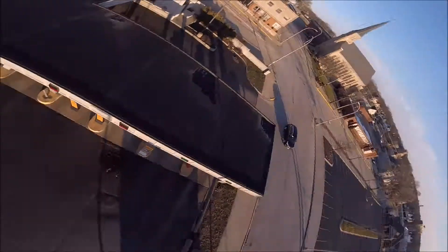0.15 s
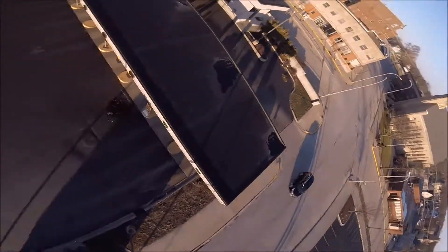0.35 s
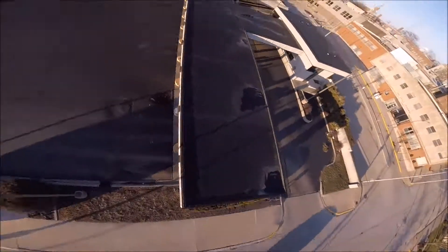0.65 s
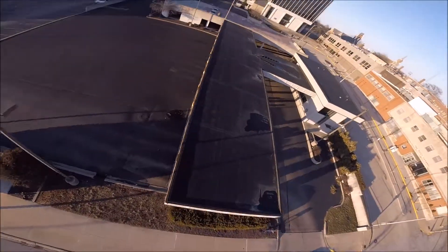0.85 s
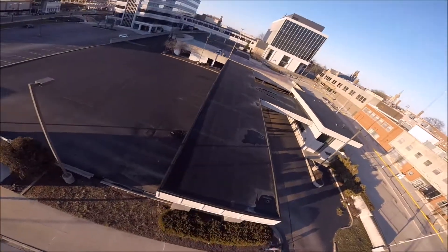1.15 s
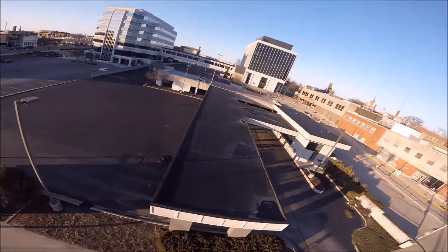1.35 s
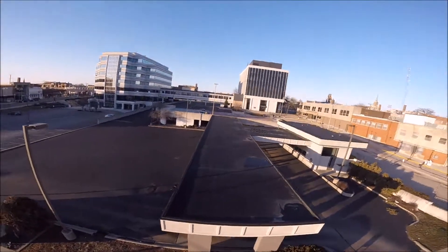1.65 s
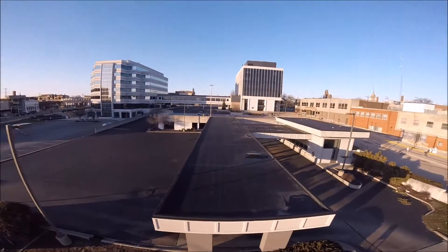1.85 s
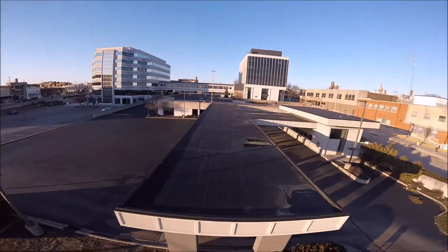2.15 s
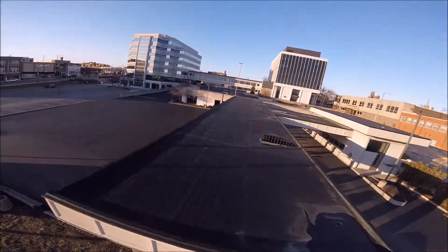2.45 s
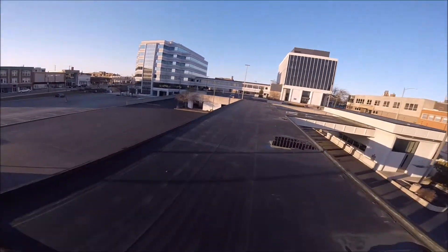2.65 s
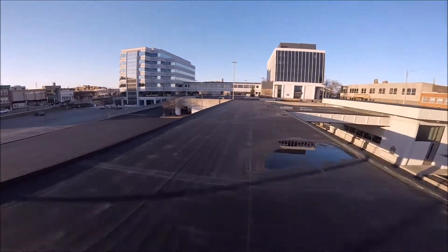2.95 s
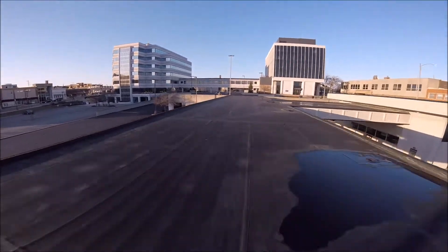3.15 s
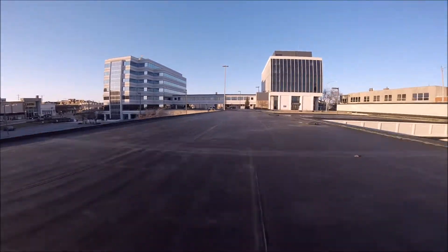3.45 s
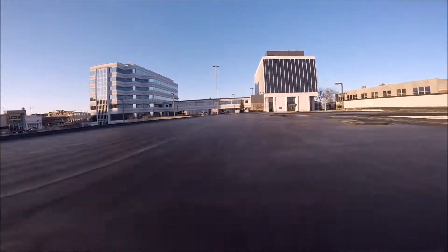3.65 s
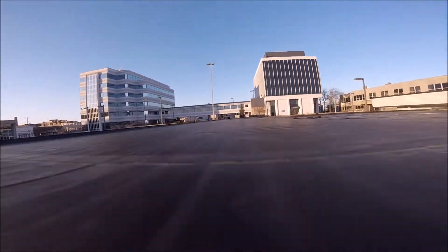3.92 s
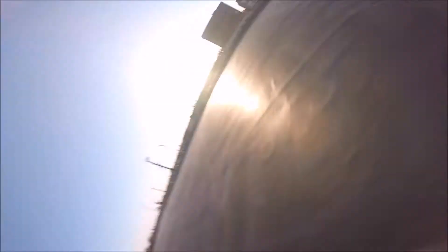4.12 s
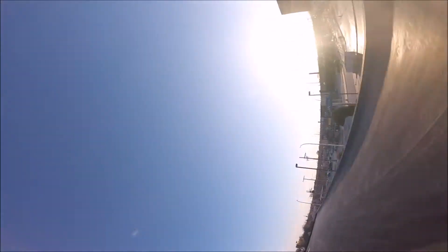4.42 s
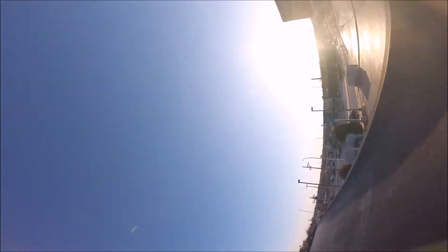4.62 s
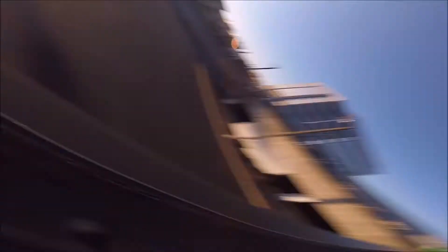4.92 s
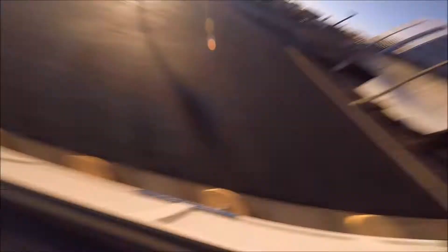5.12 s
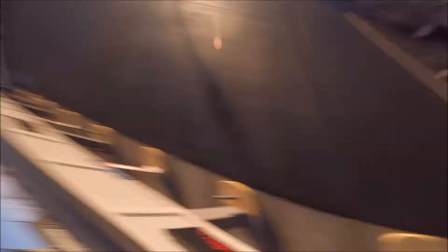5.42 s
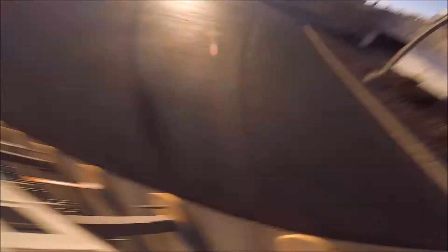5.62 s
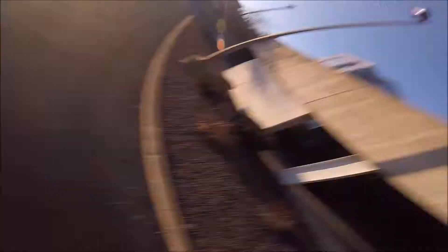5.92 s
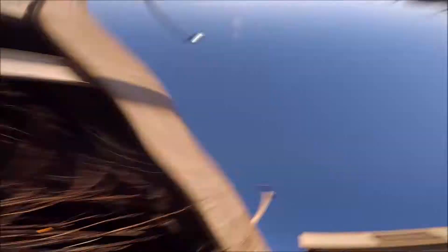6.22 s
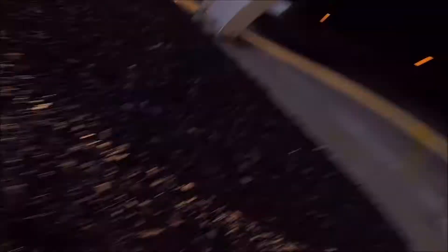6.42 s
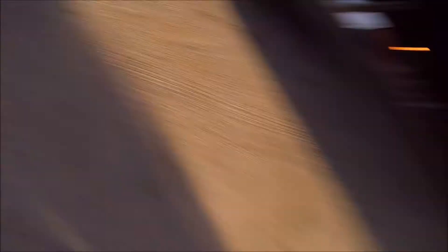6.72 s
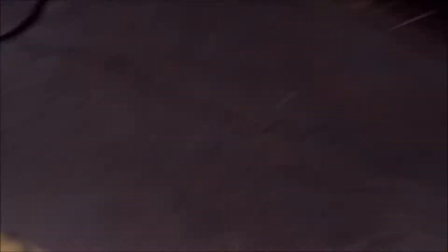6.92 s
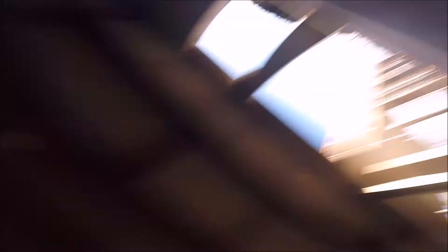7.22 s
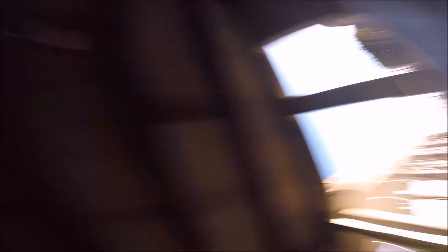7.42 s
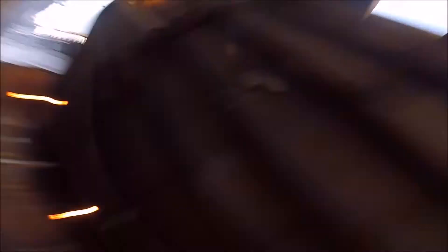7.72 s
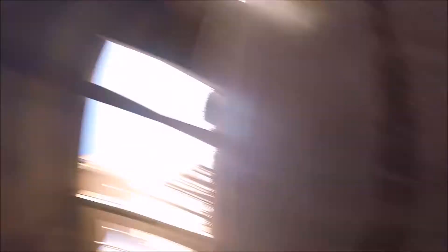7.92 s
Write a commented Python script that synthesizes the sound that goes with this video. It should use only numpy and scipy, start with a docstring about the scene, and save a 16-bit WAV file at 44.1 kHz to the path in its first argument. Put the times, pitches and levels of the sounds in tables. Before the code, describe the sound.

A close microphone on a small drone catches wind rumble and a sinking howl, then four buzzing rotors surging and beating together. After a sharp knock comes a brief piercing scream that drops away. A cluster of hits ends the motor sound. Chopped whooshes grow stronger in free fall, then dull thuds, plastic clacks and gritty cracks tumble over a concrete deck.

```python
"""Over a flat roof and down into a concrete parking deck, a small racing drone is heard from its own camera.
It dives and skims the roof: four three-bladed rotors, harmonic series of their shaft speeds, whine and beat in the wind.
It clips the roof, races upside down, winds down and strikes the edge; in free fall each turn chops the air as a puff of noise.
It cartwheels over concrete: decaying resonances knock in the frame, and bursts of coloured noise are the clacking propellers."""
import sys
import numpy as np
from scipy import signal
from scipy.fft import rfft, irfft
from scipy.io import wavfile
from scipy.ndimage import uniform_filter1d, minimum_filter1d

SR = 44100
rng = np.random.default_rng(int(sys.argv[2]) if len(sys.argv) > 2 else 0)


def store_wav(level_fs):
    """Save 16-bit WAV to argv[1]."""
    pcm = np.round(np.clip(np.atleast_2d(level_fs), -1, 1) * 32767)
    wavfile.write(sys.argv[1], SR, pcm.T.astype(np.int16))


N = 355446
TIME = np.arange(N) / SR
FLIP_S, EDGE_S, LANDING_S = 4.09, 4.83, 6.275   # turns upside down, strikes the edge, reaches the ground


def from_db(db):
    """Level to amplitude: 20 dB is a factor of ten."""
    return 10 ** (np.asarray(db) / 20)


def rms_one(x):
    """Normalisation to unit mean power."""
    return x / np.sqrt(np.mean(x ** 2) + 1e-20)


def in_time(rows):
    """Linear interpolation of each column of a curve at every sample."""
    s, *columns = np.transpose(rows)
    return [np.interp(TIME, s, c) for c in columns]


def until(end, fade):
    """Envelope of one until the end time, then a straight fade."""
    return np.clip(1 - (TIME - end) / fade, 0, 1)


def during(start, end, fade):
    """Envelope of one between two times, with straight fades centred on them."""
    return np.clip(np.minimum(TIME - start, end - TIME) / fade + .5, 0, 1)


def at_hz(points, hz):
    """Spectral gain, interpolated in dB over logarithmic frequency."""
    f, db = np.transpose(points)
    return from_db(np.interp(np.log(np.maximum(hz, 1)), np.log(f), db))


def with_skirts(spectrum, hz):
    """Spectral gain that falls 12 dB per octave further beyond the ends of the spectrum."""
    low_skirt = np.minimum(1, hz / spectrum[0][0]) ** 2
    high_skirt = np.minimum(1, spectrum[-1][0] / hz) ** 2
    return at_hz(spectrum, hz) * low_skirt * high_skirt


def noise(spectrum):
    """Coloured noise of unit power, shaped in the frequency domain."""
    hz = np.arange(N // 2 + 1) * SR / N + 1e-3
    return rms_one(irfft(rfft(rng.standard_normal(N)) * with_skirts(spectrum, hz), N))


def coloured(x, spectrum):
    """Minimum-phase filtering, causal; the response has unit energy, so white noise keeps its power."""
    hz = np.linspace(1e-3, SR / 2, 4097)
    cepstrum = irfft(np.log(with_skirts(spectrum, hz) + 1e-6))
    # folding the cepstrum onto positive times makes the filter causal
    folded = 2 * cepstrum * (np.arange(len(cepstrum)) < len(hz))
    response = irfft(np.exp(rfft(folded)))
    return signal.oaconvolve(x, response / np.sqrt(np.sum(response ** 2)))[:N]


def drift(rate):
    """Low-passed random process of unit power, changing about this often a second."""
    r = np.exp(-40 * np.pi * rate / SR)   # one step every 20 samples
    slow = signal.lfilter([1], [1, -2 * r, r * r], rng.standard_normal(N // 20 + 4002))[4000:]
    return np.interp(np.arange(N) / 20, np.arange(len(slow)), rms_one(slow))


def flicker(depth_db, rate):
    """Random amplitude modulation, held within two depths."""
    return from_db(depth_db * np.clip(drift(rate), -2, 2))


def lumpy(spectrum, depth_db, rate):
    """Turbulent noise: coloured noise whose level flickers."""
    return rms_one(noise(spectrum) * flicker(depth_db, rate))


def gritty(depth_db, rate):
    """White noise that comes in clumps by amplitude modulation."""
    return rms_one(rng.standard_normal(N) * flicker(depth_db, rate))


def ring(clicks, hz, t60):
    """Damped resonance: a unit click sets a sine of height about 1 ringing."""
    r, w = from_db(-60 / (t60 * SR)), 2 * np.pi * hz / SR
    return signal.lfilter([0, np.sin(w)], [1, -2 * r * np.cos(w), r * r], clicks + 1e-18)


def dying(clicks, t60):
    """Exponential decay started by each click."""
    return signal.lfilter([1], [1, -from_db(-60 / (t60 * SR))], clicks + 1e-18)


# Throttle: common shaft speed of the rotors [start_s, shaft_hz]
SHAFT_SPEED = [(0, 99.8), (.31, 93.07), (.47, 64.9), (.62, 59.04), (.69, 52.1), (.72, 41.85), (.78, 69.2),
               (.84, 132), (.9, 189.9), (1.0, 257.1), (1.16, 276.4), (1.24, 242.5), (1.31, 230.4),
               (1.4, 202.6), (1.57, 252.8), (1.68, 241.9), (1.82, 261.2), (1.91, 265.3), (1.99, 243.7),
               (2.09, 195.9), (2.2, 179.7), (2.28, 153.3), (2.39, 148.4), (2.44, 165.2), (2.56, 240.4),
               (2.66, 261), (2.74, 252), (2.85, 214.4), (3.0, 210.2), (3.08, 186.4), (3.2, 184.6),
               (3.34, 225.1), (3.61, 228.6), (3.81, 251), (3.86, 220.2), (3.91, 127.9), (3.99, 89.96),
               (4.07, 150.1), (4.125, 225), (4.148, 360.7), (4.183, 413.4), (4.2, 412.7), (4.22, 423.2),
               (4.236, 413.4), (4.253, 421), (4.31, 287.1), (4.35, 245.5), (4.4, 229), (4.47, 181.8),
               (4.54, 177.4), (4.6, 135.7), (4.73, 112.7)]
# Steering pulls the four speeds apart [start_s, spread as a share of the speed]
STEERING_SPREAD = [(0, 0.28), (.45, .22), (.62, 0.094), (.76, 0.099), (.88, 0.26), (1.03, 0.14),
                   (1.15, 0.13), (1.45, 0.094), (1.6, 0.075), (2.0, 0.068), (2.1, 0.031), (2.5, 0.036),
                   (2.62, 0.073), (2.85, 0.051), (3.02, 0.055), (3.15, 0.041), (3.35, 0.081), (3.8, 0.07),
                   (4.02, 0.2), (4.18, 0.029), (4.26, 0.038), (4.34, 0.052), (4.8, .06)]
# Each motor; levels relative [offset in spreads, hum_db, blade_tone_db, overtones_db, lateness in lags]
ROTOR_MOTORS = [(.05, -5, -2, -1.5, 0), (-.65, -5, -9, -10, .8), (.4, -6.5, -9.5, -10, -.6),
                (-1.6, -9, -7, -5, 1)]
# In abrupt manoeuvres the motors answer one after another [start_s, end_s, lag_s]
MOTOR_STAGGERS = [(.79, .98, .07), (4.265, 4.34, .022)]
# Unbalanced rotors shake the camera most near cruising speed [shaft_hz, relative level_db]
HUM_RESPONSE = [(60, -37.5), (120, -29.5), (145, -34.5), (188, -31), (220, -29), (243, -18.5), (266, -19),
                (300, -33), (420, -41)]
# Blade overtones [frequency_hz, relative level_db]
RASP_SPECTRUM = [(500, 7), (900, 6.5), (1500, 1), (2400, -1), (3200, -5), (4200, -18), (5200, -8.5),
                 (7000, -36), (10000, -41.5)]
# Overtones at full throttle [multiple of the shaft speed, level_db relative to the blade tone]
SCREAM_PARTIALS = [(2, -16), (4, -25.5), (6, -12.5), (8, -26), (9, -15), (11, -25), (12, -12.5), (13, -24),
                   (15, -15), (18, -22.5)]
# Churned air smears overtones into roar, clean air lets them sing
# [start_s, end_s, level_db moved from overtones to wash]
AIR_CHURN = [(1.1, 1.45, 1.5), (1.9, 3.0, -1.5), (3.2, 3.9, 1.5), (4.33, 4.9, 2.5)]
# Churned air [frequency_hz, relative level_db]
WASH_SPECTRUM = [(300, -21), (700, 11.5), (1100, -4.5), (1800, -6.5), (2500, -5), (3400, -6.5),
                 (4300, -16.5), (6000, -23.5)]
# Blade tip hiss, also the sizzle of the dive [frequency_hz, relative level_db]
HISS_SPECTRUM = [(2500, -33.5), (4200, -6), (5000, 4), (6500, 5), (7800, -1), (9000, -9), (10800, -18),
                 (12000, -35.5), (14000, -29.5), (16000, -55.5)]
FULL_FROM_HZ, FULL_SPAN_HZ = 281, 76   # shaft speed where full throttle sets in
CLEAN_DB = -18   # the ragged rasp and air noise change by this at full throttle
# pulling out of the dive, the rotors chop their own wake: pitch shudders, a harsh band of the rasp stands out
WAKE_FROM_S, WAKE_TO_S, WAKE_JITTER = .74, 1.58, .03   # jitter as a share of the speed
WAKE_HZ, WAKE_WIDTH_HZ, WAKE_DB, WAKE_HISS_DB = 3520, 610, 6, -6.5


def rotors(scream_db=-1.5, partial_flicker_db=1.5, second_db=-21, wander=.25, jitter=0.006, swell_db=4.0,
           stop_s=4.735):
    """Harmonic series of four rotating sources: every third harmonic of a shaft is a blade passing."""
    speed, = in_time(SHAFT_SPEED)
    spread, = in_time(STEERING_SPREAD)
    # at full throttle the ragged rasp gives way to a clean scream
    full = np.clip((speed - FULL_FROM_HZ) / FULL_SPAN_HZ, 0, 1)
    ragged = from_db(CLEAN_DB * full)
    churn = sum(db * during(start, end, fade=.08) for start, end, db in AIR_CHURN)
    lag = sum(s * during(start, end, fade=.06) for start, end, s in MOTOR_STAGGERS)
    wake = during(WAKE_FROM_S, WAKE_TO_S, fade=.25)
    hum, blade, rasp, hiss = rotor_levels(speed, full)
    unbalance = from_db(hum) * at_hz(HUM_RESPONSE, speed)
    orders = np.arange(4, 37)
    weights = overtone_weights(orders, speed[::50], wake[::50])

    def phase():
        """Random starting phase of a partial."""
        return rng.uniform(0, 2 * np.pi)

    tones, passing = 0, 0
    for offset, own_hum_db, own_blade_db, own_rasp_db, lateness in ROTOR_MOTORS:
        # the flight controller keeps nudging each motor
        late_speed = np.interp(TIME - lateness * lag, TIME, speed)
        steering = spread * (offset + wander * drift(5))
        shudder = jitter * (1 - full / 2) * drift(44) + WAKE_JITTER * wake * drift(70)
        hz = late_speed * (1 + steering + shudder)
        turns = np.cumsum(hz) / SR + rng.random()
        angle = (2 * np.pi * (turns % 1)).astype(np.float32)

        shake = np.sin(angle) + from_db(second_db) * np.sin(2 * angle)
        shake = from_db(own_hum_db) * unbalance * shake
        overtones = 0
        for k, w in zip(orders, weights):
            height = np.repeat(w.astype(np.float32), 50)[:N]
            overtones = overtones + height * np.sin(int(k) * angle + phase())
        scream = 0
        for k, db in SCREAM_PARTIALS:
            height = from_db(db + scream_db + partial_flicker_db * drift(37.83))
            scream = scream + height * np.sin(round(k) * angle + phase())
        swell = rms_one(flicker(swell_db, 18))
        whine = from_db(own_blade_db + blade) * (np.sin(3 * angle) + full * swell * scream)
        buzz = from_db(own_rasp_db + rasp - churn) * ragged * swell * overtones
        # flat out, the motor nearest the camera stands out from the others
        share = from_db(full * (own_blade_db - ROTOR_MOTORS[0][2]))
        tones = tones + shake + share * (whine + buzz)
        passing = passing + from_db(own_blade_db) * np.cos(3 * angle)
    air = blade_air(rasp + churn, hiss, wake, passing)
    return np.sqrt(2) * tones * until(stop_s, 0.0082) + air * ragged * until(stop_s, 0.023)


def overtone_weights(orders, speed, wake):
    """Spectral envelope over the harmonics, at unit power; those off the blade passing are weaker."""
    weights = []
    for k in orders:
        hz = k * speed
        harsh_band = np.exp(-((hz - WAKE_HZ) / WAKE_WIDTH_HZ) ** 2)
        weights.append(at_hz(RASP_SPECTRUM, hz) * from_db(WAKE_DB * wake * harsh_band) * (.22 if k % 3 else 1))
    return weights / np.sqrt(np.sum(np.square(weights), axis=0))


def blade_air(wash, hiss, wake, passing, wash_db=-1.0, hiss_db=-5.5, chop=0.86):
    """Amplitude-modulated turbulence: a puff with each blade, brighter under harder loading."""
    dull = signal.sosfilt(signal.butter(8, 7800, fs=SR, output="sos"), noise(HISS_SPECTRUM))
    bright = np.clip((hiss + 54) / 9, 0, 1)
    tip = np.sqrt(bright) * noise(HISS_SPECTRUM) + np.sqrt(1 - bright) * dull
    churned = from_db(wash + wash_db) * lumpy(WASH_SPECTRUM, depth_db=2.0, rate=26)
    air = churned + from_db(hiss + hiss_db + WAKE_HISS_DB * wake) * tip
    return air * rms_one(1 + chop * passing)


# Rasp and tip hiss follow the blade loading; levels relative [cruise_db, db per octave of speed,
# db per Hz that the shafts run ahead of the inflow, db more at full throttle]
RASP_LOADING = (-45.5, 4, 0.0186, 7.5)
HISS_LOADING = (-48, -4, 0.1649, -3.5)
# Level changes as the blades unload, windmill in the dive or bite while spooling up
# [start_s, end_s, blade_tone_db, rasp_db, tip_hiss_db]
LOADING_CHANGES = [(-.1, 0.38, -0.5, -2, -14.5), (0.373, 0.832, 4, 0.5, -13.5), (0.72, 0.812, 7, -8.5, 3),
                   (0.845, 0.962, 1.5, 1, -8.5), (2.048, 2.449, -7, 1.5, 5), (3.934, 4.14, -12, -1, -0.5),
                   (4.343, 4.902, -7, -1.5, 1)]
# Stretches of stronger rasp and hiss: hard pulls on the throttle, and the skim over the roof
# [start_s, end_s, rasp_db, tip_hiss_db]
STRONGER_STRETCHES = [(1.084, 1.25, 6.5, 1.5), (1.292, 1.355, 8.5, 7.5), (1.392, 1.8, 5, 1.5),
                      (2.448, 2.56, 6.5, 5.5), (3.482, 3.827, 3.5, 0.5)]
CRUISE_HZ = 263   # shaft speed in level flight
INFLOW_LAG_S = 0.53   # the air through the rotors takes this long to catch up with them
BLADE_TONE_DB, BLADE_FULL_DB = -32.5, 8   # blade tone before the motors' own levels; more at full throttle
# the hum recedes when the shafts run this far ahead of the inflow
HUM_FADES_FROM_HZ, HUM_FADE_DB_PER_HZ = 32, 0.2
SKIM_FROM_S, SKIM_TO_S, SKIM_DB = 3.175, 3.71, 3.5   # low over the roof, its reflection lifts blade tone and hiss


def rotor_levels(speed, full, fade_s=0.074, inverted_hum_db=-16.0):
    """Blade loading sets hum, tone, rasp and hiss in dB: blades work hardest running ahead of the inflow."""
    lag = np.exp(-1 / (INFLOW_LAG_S * SR))
    gained = speed - speed[0]
    ahead = gained - signal.lfilter([1 - lag], [1, -lag], gained)
    octaves = np.log2(speed / CRUISE_HZ)
    rasp, hiss = [db + per_octave * octaves + per_hz * ahead + full_db * full
                  for db, per_octave, per_hz, full_db in (RASP_LOADING, HISS_LOADING)]
    blade = BLADE_TONE_DB + BLADE_FULL_DB * full
    for start, end, blade_db, rasp_db, hiss_db in LOADING_CHANGES:
        on = during(start, end, fade_s)
        blade, rasp, hiss = blade + blade_db * on, rasp + rasp_db * on, hiss + hiss_db * on
    for start, end, rasp_db, hiss_db in STRONGER_STRETCHES:
        on = during(start, end, fade_s)
        rasp, hiss = rasp + rasp_db * on, hiss + hiss_db * on
    skim = SKIM_DB * during(SKIM_FROM_S, SKIM_TO_S, fade=0.026)
    hum = -HUM_FADE_DB_PER_HZ * np.maximum(ahead - HUM_FADES_FROM_HZ, 0)
    hum = hum + inverted_hum_db * during(FLIP_S, EDGE_S, fade_s)
    return hum * (1 - full), blade + skim, rasp, hiss + skim


# Every contact of a propeller, an arm or the body has its own knock; levels relative
# [start_s, pitch_hz, thud_db, clack_db, crack_db]
CONTACT_BLOWS = [(4.0496, 248, -13, -5.5, -31), (4.065, 109.5, -23, -21, -44), (4.82, 293, -35, -23.5, -46),
                 (4.826, 256, -22, -23.5, -59), (4.834, 337, -15, -15, -56), (4.8398, 110, -5, -20, -44),
                 (4.851, 180, -21, -27, -54), (4.865, 138, -16, -23.5, -58), (4.872, 330, -14, -25, -54),
                 (4.88, 123, -10, -21, -61), (4.893, 100, -19.5, -34, -66), (4.908, 110, -27, -44, -74),
                 (4.933, 133, -18.5, -33, -62), (6.218, 298, -32, -23, -42), (6.23, 121, -14, -21, -38),
                 (6.237, 202, -16, -11, -25), (6.248, 69.6, -27, -18.5, -46), (6.26, 91, -11, -21, -50),
                 (6.805, 309, -32, -44, -67), (6.8127, 290, -19, -37, -57), (6.8216, 278, -18, -15.5, -39),
                 (6.8323, 103, -17, -30, -66), (7.126, 265, -22, -40, -48.5),
                 (7.1383, 207, -11, -23.5, -46), (7.149, 110, -23, -41, -67), (7.3383, 100, -20, -55, -65),
                 (7.347, 98, -27, -51, -54), (7.393, 255, -29, -38, -50), (7.403, 244, -27, -37, -50),
                 (7.417, 90.5, -21, -29, -42.5), (7.426, 212, -13, -22, -44), (7.438, 117.4, -16, -28, -54),
                 (7.449, 95, -20, -33.5, -75), (7.698, 200, -21, -42, -54), (7.706, 248, -26, -34.5, -46.5),
                 (7.728, 70.6, -13.5, -35, -47), (7.75, 201, -19, -25.5, -48),
                 (7.757, 186.3, -11.5, -22.5, -47), (7.764, 119, -15.5, -35, -57),
                 (7.774, 129.5, -19.5, -36, -62), (7.988, 223, -20, -41, -57),
                 (7.994, 121, -19, -34, -39.5), (8.001, 257, -16, -26, -65), (8.009, 114, -15, -24.5, -50),
                 (8.024, 133, -17.5, -35, -56), (8.057, 267, -32, -37, -54)]
# Resonances of the frame and camera mount [frequency_hz, relative level_db, t60_s]
FRAME_MODES = [(35.7, -4, 0.18), (57.7, 6.5, 0.11), (111, 5, 0.091), (190, 6, 0.069), (302, -5.5, 0.058),
               (447, -13.5, 0.042), (483, -10.5, 0.048)]
# The carbon arms ring on after a blow [frequency_hz, relative level_db, t60_s]
ARM_MODES = [(127, -21, .22), (303, -28, .32), (320, -25, .34), (525, -33, .17)]
# Clack of the propellers [frequency_hz, relative level_db]
CLACK_SPECTRUM = [(150, -4), (350, 11), (650, 1.5), (1000, -4.5), (1500, -12.5), (2300, -24), (3500, -35),
                  (6000, -41)]
# Crack of grit [frequency_hz, relative level_db]
CRACK_SPECTRUM = [(1200, -7), (2400, -3.5), (3700, -6.5), (4400, -3), (5200, 1), (6000, 3.5), (7000, -6.5),
                  (8500, -6.5), (10800, -14.5), (12500, -32), (15000, -30.5)]


def knocks(knock_db=0.0, knock_t60=0.04, thud_db=-12.0, arms_db=-6.5, clack_db=4.0, clack_t60=0.02,
           rattle_db=-24, rattle_t60=.14, crack_db=0.5, crack_t60=0.025, settle_db=-34.0, settle_t60=0.43,
           press_s=0.0015):
    """Impact excitation of damped modes: a pitched knock, a rocking frame, clacks, cracking grit and rattle."""
    s, pitch, thud, clack, crack = np.transpose(CONTACT_BLOWS)

    def clicks(db):
        """One impulse per contact."""
        return np.bincount(np.round(s * SR).astype(int), from_db(db), N)[:N]

    def burst(db, t60):
        """Smoothed attack as the plastic gives, then exponential decay."""
        give = np.exp(-1 / (press_s * SR))
        return signal.lfilter([1 - give], [1, -give], dying(clicks(db), t60))

    modes = [(hz, db + thud_db, t60) for hz, db, t60 in FRAME_MODES]
    modes += [(hz, db + arms_db, t60) for hz, db, t60 in ARM_MODES]
    body = np.zeros(N)
    for k, (hz, db, t60) in enumerate(modes):
        # every blow meets each mode differently; neighbouring modes have opposite sign
        struck = clicks(thud + db + rng.normal(0, 4.2, len(s)))
        body += ring(struck, hz, t60) * (-1) ** k
    for start, hz, db in zip(s, pitch, thud):
        near = slice(int(start * SR) + 1, int((start + .15) * SR))
        t = TIME[near] - start
        decay = np.exp(-np.log(1000) * t / knock_t60)
        body[near] += from_db(db + knock_db) * decay * np.sin(2 * np.pi * hz * t)
    rattle = burst(clack + rattle_db, rattle_t60) * gritty(depth_db=3.0, rate=140)
    clacking = burst(clack + clack_db, clack_t60) * rng.standard_normal(N)
    plastic = coloured(clacking + rattle, CLACK_SPECTRUM)
    cracking = burst(crack + crack_db, crack_t60)
    settling = burst(np.minimum(crack, -48) + settle_db, settle_t60)
    grit = coloured((cracking + settling) * gritty(depth_db=2.0, rate=330), CRACK_SPECTRUM)
    # the soft camera mount rounds off the thud
    return signal.sosfilt(signal.butter(2, 900, fs=SR, output="sos"), body) + plastic + grit


SKID_FROM_S, SKID_TO_S, SKID_DB = 6.328, 6.435, -65.5   # a short scuff after the landing; starting level of its grit


def skid(scuff_db=20.5, loss_db_per_s=50):
    """Sliding friction: loose grit crackles under the frame, less as it slows."""
    scuff = from_db(scuff_db) * lumpy(CLACK_SPECTRUM, depth_db=6.5, rate=51)
    grit = lumpy(CRACK_SPECTRUM, depth_db=3.5, rate=150) + scuff
    level = SKID_DB - loss_db_per_s * np.maximum(TIME - SKID_FROM_S, 0)
    return from_db(level) * during(SKID_FROM_S, SKID_TO_S, fade=0.016) * grit


# Soft puffs of the turning frame [frequency_hz, relative level_db]
PUFF_SPECTRUM = [(25, 14.5), (70, 6.5), (130, -0.5), (280, -2.5), (450, -12), (800, -24), (1500, -44.5),
                 (3000, -86)]
# Sharper tearing of the air [frequency_hz, relative level_db]
TEAR_SPECTRUM = [(300, -9), (700, 15), (1200, 9.5), (2200, 6), (3500, -9.5), (5500, -12), (8000, -24),
                 (12000, -46)]
# Puff and tear in the fall; levels relative [apex_db, db per doubling of the airspeed]
PUFF_FALL = (-45, 5.3)
TEAR_FALL = (-68, 13.2)
# Soft swells of noise heard between the blows on the ground, some just before a blow
# [start_s, relative puff level_db]
SOFT_SWELLS = [(6.538, -54.5), (6.717, -56.5), (6.815, -54.5), (7.068, -59), (7.132, -55), (7.32, -59),
               (7.995, -61)]
SWELL_TEAR_DB, SWELL_STRETCH = -18, 1.8   # tear against the puff; swells last longer than turns
FIRST_TURN_S, TURN_S, TURN_SLOWS_S = 5.025, .0956, .00162   # first turn, its period, growth of period per turn


def spin(puff_db=8.5, puff_s=0.015, puff_early_s=0.0078, tear_s=0.0065, lead_s=0.046, lead_puff_db=-12,
         lead_tear_db=-15, flap_db=1, flap_s=0.0033, flap_early_s=0.0201, count=12):
    """Periodic modulation by rotation: a puff and pressure flap, then a sharper tear as the port faces the air."""
    k = np.arange(count)
    times = FIRST_TURN_S + TURN_S * k + TURN_SLOWS_S * k * (k - 1) / 2
    turns = [(s, fall_level(s, PUFF_FALL), fall_level(s, TEAR_FALL), 1) for s in times]
    swells = [(s, db, db + SWELL_TEAR_DB, SWELL_STRETCH) for s, db in SOFT_SWELLS]
    low, high, flaps = np.zeros((3, N))
    for s, puff, tear, stretch in turns + swells:
        near = slice(int((s - .15) * SR), int((s + .15) * SR))
        t = (TIME[near] - s) / stretch
        main_puff = np.exp(-((t + puff_early_s) / puff_s) ** 2)
        lead_puff = from_db(lead_puff_db) * np.exp(-((t + lead_s) / puff_s) ** 2)   # a corner leads
        low[near] += from_db(puff) * (main_puff + lead_puff)
        main_tear = np.exp(-abs(t) / tear_s)
        lead_tear = from_db(lead_tear_db) * np.exp(-abs(t + lead_s) / tear_s)
        high[near] += from_db(tear) * (main_tear + lead_tear)
        u = (t + flap_early_s) / flap_s
        flaps[near] += from_db(puff + flap_db) * (2 * u ** 2 - 1) * np.exp(-u ** 2)
    tearing = high * lumpy(TEAR_SPECTRUM, depth_db=2.5, rate=300)
    return flaps + from_db(puff_db) * low * noise(PUFF_SPECTRUM) + tearing


# thrown up by the edge, the drone falls freely
APEX_S, FORWARD_M_PER_S, GRAVITY_M_PER_S2 = 5.226, 1.5, 9.81


def fall_level(s, law):
    """Free fall: the level in dB of an air noise grows with the airspeed."""
    apex_db, db_per_doubling = law
    airspeed = np.hypot(FORWARD_M_PER_S, GRAVITY_M_PER_S2 * (s - APEX_S))
    return apex_db + db_per_doubling * np.log2(airspeed / FORWARD_M_PER_S)


# Air in the dive, as sizzle, rasp, roar and flutter in turn; levels relative
# [peak_s, peak_db, rise in db per s, fall in db per s]
DIVE_RUSHES = [(.045, -41, 300, 240), (.11, -30.5, 90, 72), (.19, -26.5, 35, 58), (.34, -26.5, 70, 130)]
# Rasp of the dive [frequency_hz, relative level_db]
DIVE_RASP_SPECTRUM = [(1000, -14), (1500, -3.5), (2000, 1), (2600, -5), (3800, -9), (4600, -23.5),
                      (12000, -53.5)]
# Roar of the dive [frequency_hz, relative level_db]
ROAR_SPECTRUM = [(300, 2.5), (500, 2), (800, 3), (1250, 11.5), (1600, -6), (2500, -42.5)]
# Flutter of the dive and of the wind [frequency_hz, relative level_db]
FLUTTER_SPECTRUM = [(80, -9), (160, 3), (280, 5), (400, -6), (600, -7.5), (1000, -16), (2000, -29.5)]
# the howl of the dive sinks as the drone pulls round
HOWL_FROM_S, HOWL_TO_S = .2, 0.43
HOWL_HZ, HOWL_OCTAVES_PER_S, HOWL_DB = 940, -5, -32.5   # pitch at its start, glide, level


def dive(rush_db=-1.5, end_s=0.367):
    """Turbulent flow noise, duller as the drone pulls round, and a howl of noise on a gliding carrier."""
    rush = 0
    spectra = (HISS_SPECTRUM, DIVE_RASP_SPECTRUM, ROAR_SPECTRUM, FLUTTER_SPECTRUM)
    for (s, db, rise, fall), spectrum in zip(DIVE_RUSHES, spectra):
        level = db - np.maximum(rise * (s - TIME), fall * (TIME - s))
        rush = rush + from_db(level) * noise(spectrum)
    rush = rush * from_db(rush_db + 2.0 * drift(70)) * during(-0.0064, end_s, fade=0.065)
    hz = HOWL_HZ * 2 ** (HOWL_OCTAVES_PER_S * (TIME - HOWL_FROM_S))
    eddies = signal.sosfilt(signal.butter(3, 190, fs=SR, output="sos"), rng.standard_normal(N))
    howl = np.sqrt(2) * rms_one(eddies) * np.sin(2 * np.pi * np.cumsum(hz) / SR)
    return rush + from_db(HOWL_DB) * howl * during(HOWL_FROM_S, HOWL_TO_S, fade=0.099)


# Buffeting of the camera in flight [start_s, relative level_db]
FLIGHT_WIND = [(0.0, -25.5), (0.05, -33.5), (0.12, -27), (.38, -23), (.49, -28.5), (.72, -30.5),
               (0.82, -29.5), (0.94, -24), (1.46, -27.5), (2.02, -44.5), (2.56, -29.5), (2.72, -32),
               (3.83, -27.5), (4.07, -25.5), (4.13, -37.5), (4.55, -48), (4.71, -40), (4.78, -62)]
# Rumble of the eddies [frequency_hz, relative level_db]
RUMBLE_SPECTRUM = [(15, -14), (30, -3.5), (60, 1), (110, -1), (160, -2), (250, -13), (500, -35.5)]
# Air noise of the fall [relative apex_db, db per doubling of the airspeed]
WIND_FALL = (-55, 6.1)
# Buffeting on the ground as the drone slows [relative landing_db, db per s]
TUMBLE_WIND = (-55.5, -7)
# flutter under buffeting of WIND_REF_DB; dB per dB of buffeting
WIND_REF_DB, FLUTTER_DB, FLUTTER_FOLLOWS = -28, -33.5, 1.3
INVERTED_FLUTTER_DB = -40   # added while the drone is upside down


def wind(rumble_db=0.5, settle_s=0.23):
    """Turbulent pressure on the microphone port; once the drone spins, the port is mostly in the lee."""
    flight, = in_time(FLIGHT_WIND)
    facing, airborne = until(EDGE_S, 0.16), until(LANDING_S, settle_s)
    landing_db, db_per_s = TUMBLE_WIND
    tumbling = landing_db + db_per_s * (TIME - LANDING_S)
    spinning = airborne * fall_level(TIME, WIND_FALL) + (1 - airborne) * tumbling
    level = facing * flight + (1 - facing) * spinning
    flutter = from_db(FLUTTER_DB + FLUTTER_FOLLOWS * (level - WIND_REF_DB))
    flutter = flutter + from_db(INVERTED_FLUTTER_DB) * during(FLIP_S, EDGE_S, fade=0.057)
    rumble = from_db(level + rumble_db) * lumpy(RUMBLE_SPECTRUM, depth_db=2.5, rate=10)
    eddies = rumble + flutter * lumpy(FLUTTER_SPECTRUM, depth_db=2.0, rate=20)
    sheltered = signal.sosfilt(signal.butter(4, 520, fs=SR, output="sos"), eddies)
    return facing * eddies + (1 - facing) * sheltered


# Thin whistles of idling motors and of air over the falling frame [start_s, end_s, pitch_hz, level_db]
THIN_WHISTLES = [(0.42, 0.89, 6650, -66), (4.655, 4.75, 6596, -66), (5.7, 6.235, 3650, -80),
                 (5.9, 6.235, 5250, -81), (6.0, 6.235, 2100, -71)]


def whistles(width_hz=160):
    """Resonance driven by noise: narrow, unsteady bands swell and fade."""
    out = 0
    t60 = np.log(1000) / (np.pi * width_hz)
    for start, end, hz, db in THIN_WHISTLES:
        swell = np.clip(np.minimum(TIME - start, end - TIME) / 0.018, 0, 1)
        band = rms_one(ring(gritty(depth_db=-9.0, rate=5.2), hz, t60))
        out = out + from_db(db) * swell * band
    return out


def deck(x, wet_db=-34.5, t60=0.12):
    """Reverberation as exponentially decaying noise: faint, dull reflections from the concrete around."""
    dull = noise([(100, 0), (500, 0), (2000, -6), (6000, -10), (12000, -25)])   # (Hz, dB)
    tail = (dull * from_db(-60 * TIME / t60))[:SR]
    return from_db(wet_db) * signal.fftconvolve(x, tail / np.sqrt(np.sum(tail ** 2)))[:N]


def faint_hiss(level_db=-83.5):
    """Stationary noise floor, falling towards the treble."""
    return from_db(level_db) * noise([(100, -5.5), (1000, -13.0), (4000, -21.0), (15000, -33.5)])   # (Hz, dB)


def scene():
    """Superposition of flight, fall and tumble over a faint hiss."""
    hits = knocks()
    sources = rotors() + hits + skid() + spin() + dive() + wind() + whistles()
    return (sources + deck(hits) + faint_hiss())[None]


def record(dry, ceiling=.235, release_db_per_s=499.5):
    """Peak limiting by the camera with a steady release, then a steep low-pass."""
    over = 20 * np.log10(np.maximum(np.abs(dry[0]) / ceiling, 1))
    held = np.maximum.accumulate(over + release_db_per_s * TIME) - release_db_per_s * TIME
    # 89 samples: the gain moves smoothly over about 2 ms, ahead of each peak
    gain = uniform_filter1d(minimum_filter1d(from_db(-held), size=89), size=89)
    # 70 dB down from 15800 Hz
    return signal.sosfilt(signal.cheby2(14, 70, 15800, fs=SR, output="sos"), dry * gain)


dry = scene()
out = record(dry)
store_wav(out)
```